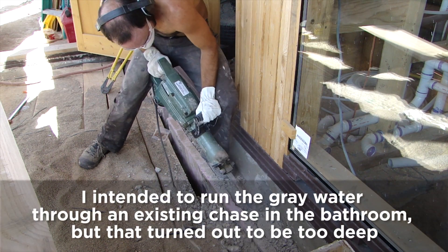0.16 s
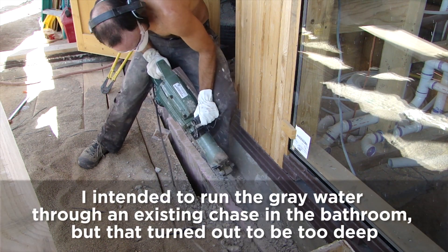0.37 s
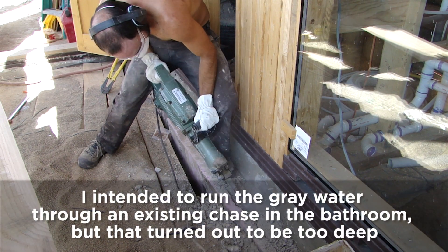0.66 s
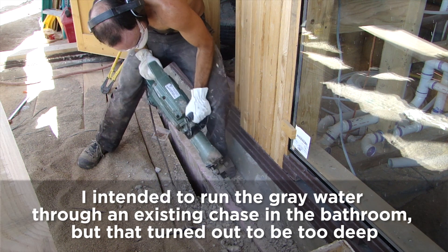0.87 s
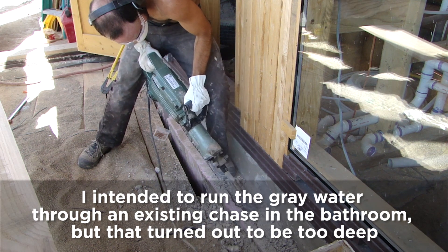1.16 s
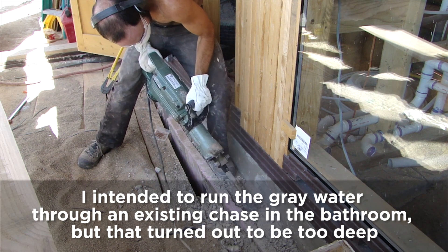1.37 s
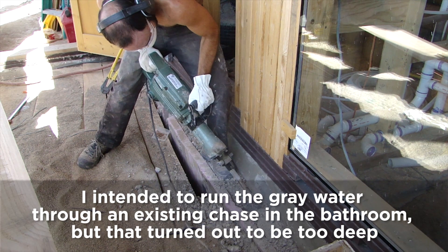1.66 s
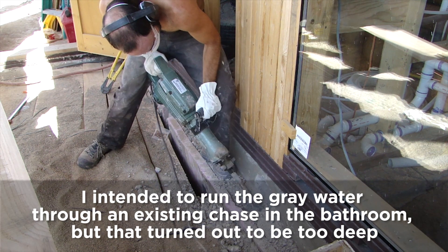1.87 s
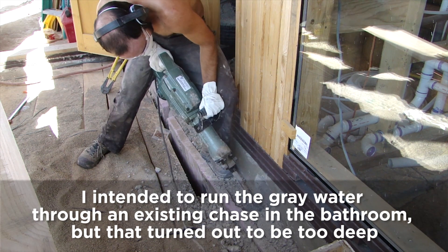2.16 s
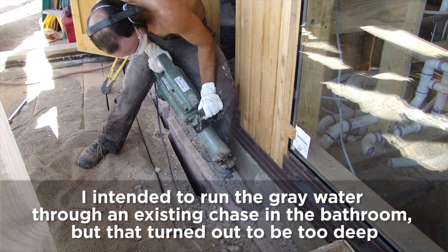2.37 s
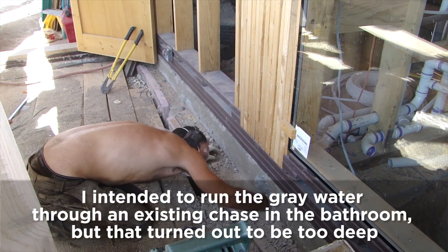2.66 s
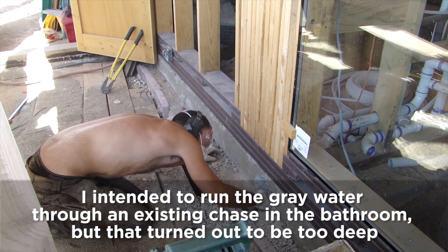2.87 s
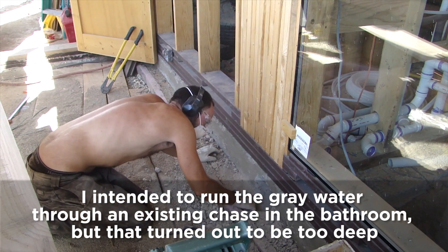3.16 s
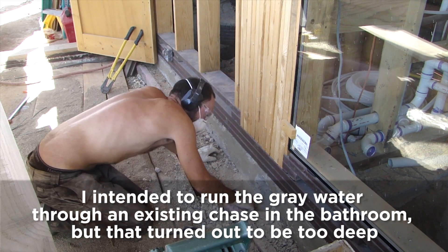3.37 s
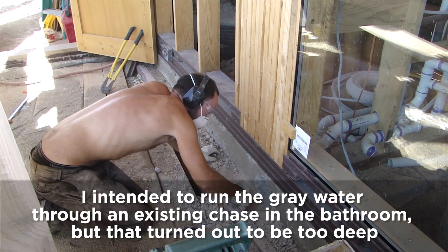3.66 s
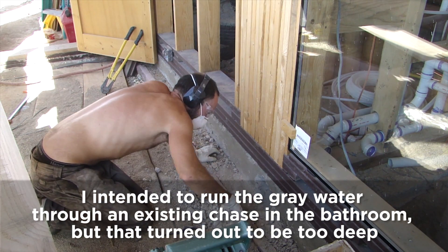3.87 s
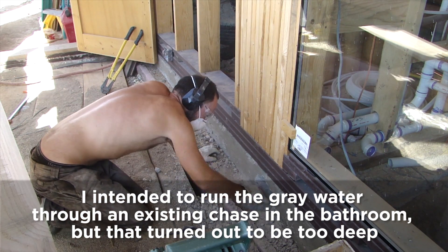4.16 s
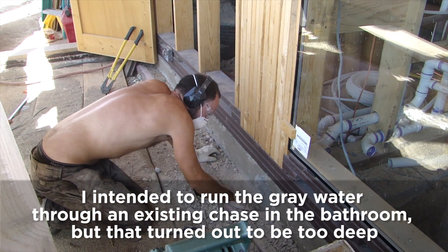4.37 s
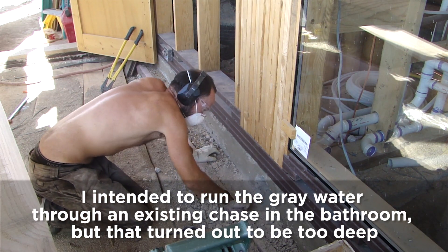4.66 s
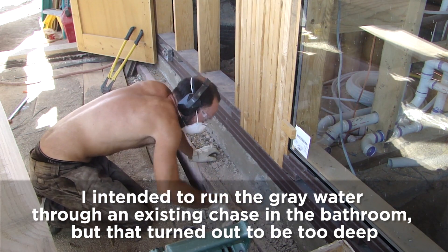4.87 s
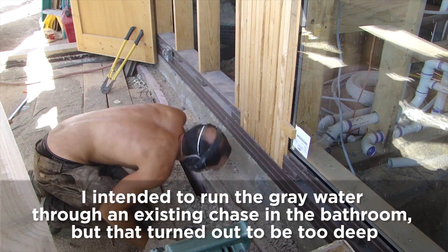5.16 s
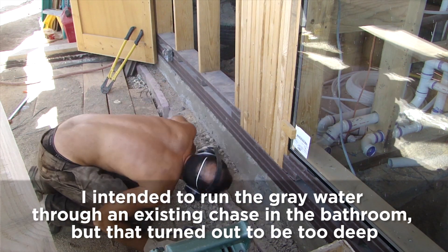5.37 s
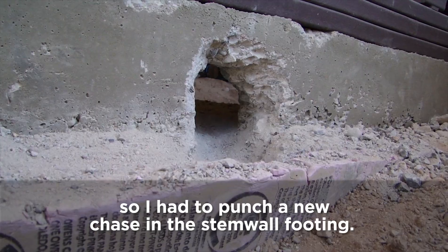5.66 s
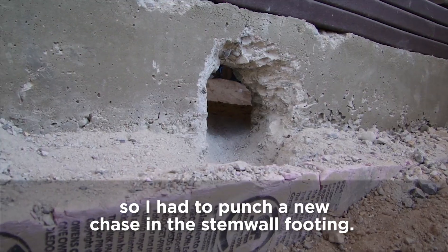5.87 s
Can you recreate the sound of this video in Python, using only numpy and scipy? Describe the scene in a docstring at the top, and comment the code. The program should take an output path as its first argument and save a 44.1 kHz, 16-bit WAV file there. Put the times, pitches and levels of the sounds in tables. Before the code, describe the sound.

From 0 to 0.85 s an electric demolition hammer chisels concrete very loudly: dry cracks at around 24 a second, each restarting a bright, uneven steel ring with hissing grit, over rasping gears and rattling housing. The blows stop and the motor sags, quietest near 0.95 s, then its gritty whirr climbs again to about 1.5 s. A hard clack and thud hit at 1.76 s; smaller jolts near 1.95 s lead into a strained, rattling run with a thin screech until 2.73 s. There everything cuts dead. Much quieter, rubble is dragged over boards in short gritty scrapes, with stony clacks and clinks, strongest around 3.6 and 4.5 s. After 4.8 s only sparse soft knocks and a faint rub remain, with a dull thump near 5.7 s and faint steady outdoor air. Short timber-room echo, small bass-light microphone.

```python
"""Demolition hammer, then rubble cleared by hand

In a timber-framed room an electric demolition hammer chisels a concrete footing: each blow cracks
and restarts a set of dying sines, the ring of the steel. The tool runs on with rasping gears (coloured
grains) and kicks, until a hard cut at 2.73 s goes straight to the rubble: grains and noise bursts make
broken concrete dragged across the floor by hand, with knocks and clinks. Faint outdoor air lies behind."""
import sys
import numpy as np
from scipy import signal
from scipy.fft import rfft, irfft, next_fast_len
from scipy.io import wavfile

SR = 44100
rng = np.random.default_rng(int(sys.argv[2]) if len(sys.argv) > 2 else 0)


def wav_out(sig):
    """Save sig, one row per channel (or a flat mono array), as 16-bit PCM at SR to the path in sys.argv[1]."""
    wavfile.write(sys.argv[1], SR, np.round(np.clip(np.atleast_2d(sig).T, -1, 1) * 32767).astype(np.int16))


N = 265036  # samples, about 6 s

# Resonances of housing and gear case: (frequency [Hz], width [Hz], lift [dB])
HOUSING = [(392, 21, 0.5), (553, 28, 6.5), (796, 37, 2.5), (1153, 35, 1.5), (1287, 31, 4.5),
           (1554, 24, 9.5), (1894, 33, -2), (1937, 70, 4.5), (2210, 82, 2), (2330, 30, 1.5), (2690, 64, 3),
           (2960, 120, -0.5), (3040, 54, 3), (3196, 90, 5), (4220, 92, 9.5), (4410, 32, 8.5),
           (7547, 200, -2), (9300, 780, 5.5)]
# Hollow resonances of the floor boards: (frequency [Hz], width [Hz], lift [dB])
BOARDS = [(342, 19, -0.5), (523, 28, 4.5), (678, 18, 6), (858, 46, 5), (1120, 40, 6.5), (1270, 35, 4.5),
          (1400, 30, 1.5), (1554, 50, 3.5), (1840, 120, 2.5), (2810, 74, 6), (3080, 50, 3),
          (3560, 75, -0.5), (3450, 80, 0.5), (3900, 79, 5)]
# Ring of the loose pieces: (frequency [Hz], width [Hz], lift [dB])
STONES = [(1180, 61, 3), (1430, 200, 1), (2710, 93, 0), (3430, 100, 2)]
# Low spectrum of tool and floor shaking: (frequency [Hz], relative level [dB])
RUMBLE = [(25, -38), (70, -34), (140, -13.5), (210, -3), (310, -2.5), (520, 1.5), (1100, 6), (2000, -0.5),
          (4000, -35), (13000, -60)]
# Spectrum of the tip cracking concrete: (frequency [Hz], relative level [dB])
CRACK = [(30, -41.5), (150, -42), (500, -16.5), (1200, 2.5), (3300, 8), (6000, 3), (8000, -7.5),
         (12000, -10.5), (13500, -31)]
# Spectrum of stone grinding on stone: (frequency [Hz], relative level [dB])
GRIND = [(100, -60), (600, -1), (1100, -0.5), (1500, 2.5), (2300, -0.5), (3300, -2), (4500, -7),
         (7000, -17), (13000, -46)]


def chisel():
    """Each blow cracks the concrete, chokes the old ring of the steel and starts a new one, duller or brighter."""
    # Piston blows: (time [s], crack [dB], ring [dB], pitch where the steel rings most [Hz])
    blows = [(0.085, -2, -20.5, 8540), (0.144, -2, -36.5, 5930), (0.1943, -2, -23, 8020),
             (0.2442, -3.5, -20.5, 8500), (0.2908, -5, -24, 6200), (0.3344, -5.5, -31, 4000),
             (.3718, -1.5, -18, 4000), (.4129, -12.5, -18, 6200), (0.4564, -6, -19.5, 6210),
             (0.5017, -6.5, -25.5, 5600), (0.5388, -5, -21, 5020), (0.5805, -9.5, -25, 6500),
             (0.6185, -3, -30.5, 7500), (0.6594, -6.5, -26.5, 4000), (0.7026, -6.5, -26, 6200),
             (0.744, -10, -28.5, 7540), (.7843, -8.5, -19.5, 4000), (0.831, -8, -28, 7900),
             (.881, -35, -42, 6500)]
    # Free ring of the steel: (frequency [Hz], level [dB], decay by 60 dB [s])
    steel_modes = [(3920, 2, .2), (5012, -3, .3), (6118, 0, .35), (6223, -5, .25), (7483, -3.5, .4),
                   (8036, -12, .25), (8753, -4, .28), (8850, -8, .15), (10928, -13, .45), (11520, -9, .22)]
    # Grit sprayed from the tip: (frequency [Hz], relative level [dB])
    spray_spectrum = [(500, -39), (3000, -9.5), (6000, -0.5), (9000, 3.5), (10500, -1), (11600, 7),
                      (12300, -4.5), (13000, -24)]
    spray_db, spray_t60_s = -24, 0.23  # level relative to the crack
    falloff_db_per_octave, scatter_db = -15.5, 2.5

    times, crack_db, ring_db, centre_hz = np.transpose(blows)
    t = np.arange(N) / SR
    last = np.maximum(np.searchsorted(times, t) - 1, 0)  # index of the latest blow
    age = np.maximum(t - times[last], 0)
    spray_envelope = dying(times, crack_db + spray_db, spray_t60_s)
    spray = spray_envelope * colour(grains(per_s=3900, spread_db=2.0), spray_spectrum)
    out = burst(times, crack_db, 0.012, CRACK) + spray
    for hz, level_db, t60 in steel_modes:
        octaves_off = np.abs(np.log2(hz / centre_hz))
        strength_db = ring_db + level_db + falloff_db_per_octave * octaves_off
        strength_db = strength_db + rng.normal(0, scatter_db, len(times))
        # the tip seats differently every time
        pitch = hz * (1 + 0.0021 * rng.standard_normal(len(times)))
        ring = np.sin(2 * np.pi * pitch[last] * age)
        out = out + from_db(strength_db[last] - 60 * age / t60) * ring
    return out


def motor():
    """Gear teeth and loose parts clatter in the droning housing; load adds rattle, screech and floor rumble."""
    # How hard the motor drives the gears: (time [s], level [dB])
    effort_curve = [(0, -17), (.07, -17.5), (.11, -24), (.3, -22), (.65, -20.5), (.75, -28), (.87, -30.5),
                    (.95, -34), (1.2, -26.5), (1.46, -21), (1.75, -21), (1.83, -24.5), (1.95, -25),
                    (1.99, -17), (2.24, -17.5), (2.35, -20.5), (2.6, -22.5), (2.72, -23)]
    # Leaning on the tool: (start [s], end [s], rattle [dB], screech [dB], floor rumble [dB])
    loads = np.array([(0, 0.871, -25, -45.5, -29.5), (1.965, 2.733, -27, -29, -38.5)])
    # The housing groans as the mechanism takes hold: (time [s], level [dB])
    groans = np.array([(.04, -33), (1.72, -32), (2.02, -27.5)])
    # Spectra of gears, loose parts, screech and drone: (frequency [Hz], relative level [dB])
    rasp_spectrum = [(200, -43.5), (330, -28.5), (440, -13), (700, -11.5), (1050, -8.5), (1300, -5.5),
                     (2000, -1.5), (3100, 2), (4300, -2.5), (5400, -6.5), (7000, -15), (10000, -23),
                     (14000, -58.5)]
    rattle_spectrum = [(2000, -24), (4000, 11.5), (6000, 9), (7500, 2), (9700, 2), (11800, -2.5),
                       (12600, -16.5), (13200, -38)]
    screech_spectrum = [(500, -52.5), (3500, -7), (4500, -5), (5400, 3), (5900, -11.5), (7000, -22),
                        (13000, -53.5)]
    drone_spectrum = [(200, -45), (340, -21), (410, -2), (560, 1.5), (680, -3), (1000, -20), (4000, -61.5)]
    # what follows the effort even without load, relative to it
    free_rattle_db, free_screech_db, free_rumble_db, free_drone_db = -18.5, -28.5, -24.5, -13
    drone_follows = 1.48  # the drone grows faster than the rasp: dB per dB
    attack_s, sag_db_per_s, release_db_per_s = 0.035, -7, -170
    groan_width_s = 0.032  # from the peak to 1/e

    t = np.arange(N) / SR
    times, effort_db = np.transpose(effort_curve)
    effort = from_db(np.interp(t, times, effort_db))
    leaning = [push(start, end, attack_s, sag_db_per_s, release_db_per_s) for start, end in loads[:, :2]]
    load_levels_db = [(free_rattle_db, free_screech_db, free_rumble_db), *loads[:, 2:]]
    rattle_gain, screech_gain, rumble_gain = together([effort] + leaning, load_levels_db)
    swells = [np.exp(-((t - s) / groan_width_s) ** 2) for s in groans[:, 0]]
    drone_gain = together([effort ** drone_follows] + swells, [free_drone_db, *groans[:, 1]])

    shake = rms_one(from_db(1.74 * drift(330)))  # the striker tumbles unevenly in its tube
    rasp = from_db(-1.0) * effort * colour(grains(per_s=12000, spread_db=2.5), rasp_spectrum, HOUSING)
    rattle = rattle_gain * colour(grains(per_s=6000, spread_db=4.5), rattle_spectrum)
    screech = screech_gain * colour(rng.standard_normal(N), screech_spectrum)
    rumble = rumble_gain * colour(rng.standard_normal(N), RUMBLE, HOUSING)
    drone = drone_gain * colour(rng.standard_normal(N), drone_spectrum, HOUSING)
    return shake * (rasp + rattle + screech) + rumble + drone


def kicks():
    """A hard clack and a thud as the tip bites, then the housing and floor shudder."""
    # The housing jolts as the chisel slips: (time [s], clack [dB], bite of the tip [dB], thud [dB])
    jolts = [(1.7637, -5, -25, -23), (1.935, -21, -24, -48), (1.968, -19, -6.5, -45)]
    # Spectrum of a jolt: (frequency [Hz], relative level [dB])
    jolt_spectrum = [(30, -44), (200, -44), (550, 4.5), (1000, -8), (2500, 5), (4200, -4), (7000, -17),
                     (9000, -7), (12000, -28), (13000, -47)]
    # Resonances of the casing: (frequency [Hz], width [Hz], lift [dB])
    casing = [(1320, 200, 10), (2420, 240, 6.3), (4250, 300, 6), (8860, 750, 7.5)]
    shudder_db, shudder_t60_s = -3.5, 1  # level relative to the thud

    times, clack_db, bite_db, thud_db = np.transpose(jolts)
    clack = burst(times, clack_db, 0.026, jolt_spectrum, casing)
    bite = burst(times, bite_db, 0.0084, CRACK)
    thud = burst(times, thud_db, 0.092, RUMBLE, HOUSING)
    shudder = burst(times, thud_db + shudder_db, shudder_t60_s, RUMBLE, HOUSING)
    return clack + bite + thud + shudder


def rubble():
    """Coarse pieces rub the boards and grind on each other in fits and starts while sand hisses between them."""
    # Strokes of the hand: (start [s], length [s], stones grinding [dB], boards rubbed [dB],
    # sandy hiss [dB], swell [dB/s])
    strokes = np.array([(2.687, 0.099, -35.5, -37.5, -51, -44), (2.806, 0.2, -45, -45, -57, 15),
                        (2.989, 0.28, -43.5, -44.5, -54, 17), (3.275, .05, -43.5, -57, -49, 0),
                        (3.368, 0.12, -44, -50, -56, 116), (3.491, 0.11, -35, -39, -44, 18),
                        (3.595, 0.028, -25.5, -47, -33.5, -3), (3.959, 0.089, -56.5, -71, -48.5, 15),
                        (4.069, 0.097, -42.5, -52.5, -51, 35), (4.284, .10, -51.5, -57.5, -56, 175),
                        (4.362, 0.079, -38, -42, -37, 0), (4.446, 0.14, -28, -38, -40, -26),
                        (4.596, 0.045, -38, -50, -45.5, 2), (4.669, 0.065, -39, -49, -43, 95),
                        (4.89, .08, -66, -56, -51, 0), (5.16, 0.41, -58.5, -57, -73, 2)])
    # Spectra of rubbed boards and hissing sand: (frequency [Hz], relative level [dB])
    rub_spectrum = [(40, -38), (130, -25.5), (195, -11.5), (280, -12), (350, -4), (520, -4.5), (830, -5),
                    (1100, -9.5), (2000, -15), (8000, -53)]
    sand_spectrum = [(150, -50), (1500, -18), (3500, 0), (6000, 1), (8000, -3.5), (11500, -1.5),
                     (12500, -13), (13200, -34)]

    envelopes = [stroke(start, length, swell) for start, length, *_, swell in strokes]
    grind_gain, rub_gain, sand_gain = together(envelopes, strokes[:, 2:-1])
    catching = rms_one(from_db(0.63 * drift(110)))
    rub = rub_gain * colour(grains(per_s=4000, spread_db=1.7), rub_spectrum, BOARDS)
    grind = grind_gain * colour(grains(per_s=5000, spread_db=2.5), GRIND, BOARDS + STONES)
    sand = sand_gain * colour(grains(per_s=4000, spread_db=2.5), sand_spectrum)
    return catching * (rub + grind + sand)


def stroke(start, length, swell_db_per_s):
    """The hand pushes and lets go; loose pieces go on sliding and settle more slowly."""
    attack_s, release_db_per_s = 0.045, -230
    settle_db, settle_db_per_s = -12, -68
    pushed = push(start, start + length, attack_s, swell_db_per_s, release_db_per_s)
    settling = push(start, start + length, attack_s, swell_db_per_s, settle_db_per_s)
    return np.maximum(pushed, from_db(settle_db) * settling)


def lumps():
    """A lump lands with a tick, a clack on its neighbours and a trickle of grit; the boards thump under it."""
    # Lumps knocking: (time [s], clink [dB], stony clack [dB], board thump [dB])
    landings = [(3.010, -35, -42, -53), (3.408, -41, -42, -48), (3.642, -25, -20, -51),
                (3.856, -41.5, -40.5, -46), (4.079, -56, -38.5, -67), (4.269, -46, -39.5, -44),
                (4.500, -34, -26, -47), (4.714, -30, -31.5, -55), (4.827, -61, -48, -60),
                (4.877, -43, -63, -70), (4.948, -60.5, -40, -51.5), (5.060, -59, -72, -65),
                (5.100, -55, -49, -63), (5.206, -56, -41, -47), (5.682, -68, -49.5, -56),
                (5.727, -68, -58, -56), (5.833, -69, -60, -59)]
    # Spectra of clink and thump: (frequency [Hz], relative level [dB])
    clink_spectrum = [(100, -55), (800, -37), (2500, 2), (4500, 5.5), (7000, -0.5), (12000, -1.5),
                      (13200, -32)]
    thump_spectrum = [(30, -24), (90, -20), (140, 3), (330, 5.5), (700, 3), (1200, -24), (2500, -40),
                      (10000, -70)]
    clack_rise_s = 0.005  # the neighbours are jostled one after another

    times, clink_db, clack_db, thump_db = np.transpose(landings)
    tick = burst(times, clink_db, 0.012, clink_spectrum)
    grit = colour(grains(per_s=3500, spread_db=2.5), clink_spectrum)
    trickle = from_db(-2) * dying(times, clink_db, 0.25) * grit
    lag = np.exp(-1 / (clack_rise_s * SR))
    jostled = signal.lfilter([1 - lag], [1, -lag], dying(times, clack_db, 0.16))
    clack = jostled * colour(grains(per_s=6000, spread_db=2.5), GRIND, BOARDS + STONES)
    thump = burst(times, thump_db, 0.15, thump_spectrum, BOARDS)
    return tick + trickle + clack + thump


def thuds():
    """The floor gives a low, short boom under a weight."""
    # Dull thuds of weight on the floor: (time [s], level [dB])
    weights = [(4.517, -53), (5.681, -54)]
    # Spectrum of the boom: (frequency [Hz], relative level [dB])
    thud_spectrum = [(30, -14), (130, -5), (200, 2), (400, -25), (2000, -63)]
    times, level_db = np.transpose(weights)
    return burst(times, level_db, 0.089, thud_spectrum)


def outdoor_air():
    """Steady noise of distant outdoor air through the open walls."""
    # Spectrum of the air: (frequency [Hz], relative level [dB])
    air_spectrum = [(25, -17), (60, -8.5), (150, 1.5), (300, 7.5), (600, 2.5), (1200, -1.5), (2200, -2),
                    (5000, -11), (11000, -13.5), (12500, -24.5), (13200, -42)]
    return from_db(-59) * colour(rng.standard_normal(N), air_spectrum)


def room(x, wet_db, wall_hz):
    """Direct sound plus dense, dulled reflections from the timber walls."""
    t60_s = 0.34
    t = np.arange(SR // 2) / SR
    tail = rng.standard_normal(len(t)) * from_db(-60 * t / t60_s)
    tail = tail * (t > .004)  # the first reflection takes 4 ms
    dulling = signal.butter(1, wall_hz, fs=SR, output="sos")
    tail = signal.sosfilt(dulling, tail / np.linalg.norm(tail))
    return x + from_db(wet_db) * signal.fftconvolve(x, tail)[:N]


def burst(times, levels_db, t60, spectrum, resonances=()):
    """Impacts on a body whose dense modes die together."""
    return dying(times, levels_db, t60) * colour(rng.standard_normal(N), spectrum, resonances)


def dying(times, levels_db, t60):
    """An envelope that jumps at each time and falls 60 dB in t60 seconds."""
    jumps = np.zeros(N)
    jumps[np.round(np.asarray(times) * SR).astype(int)] = from_db(levels_db)
    return signal.lfilter([1], [1, -from_db(-60 / (t60 * SR))], jumps + 1e-18)


def push(start, end, attack_s, slope_db_per_s, release_db_per_s):
    """An envelope that rises, holds with a slope and dies away."""
    t = np.arange(N) / SR
    held = np.clip(t, start, end) - start
    after = np.maximum(t - end, 0)
    rise = np.clip((t - start) / attack_s, 0, 1)
    return rise * from_db(slope_db_per_s * held + release_db_per_s * after)


def together(envelopes, levels_db):
    """Envelopes added in power: one gain curve for each column of levels."""
    return np.sqrt(from_db(levels_db).T ** 2 @ np.array(envelopes) ** 2)


def grains(per_s, spread_db):
    """Random tiny contacts: many weak ones, a few strong; rms 1."""
    born = rng.random(N) < per_s / SR
    sizes = from_db(spread_db * np.minimum(rng.exponential(1, N), 4))
    return rms_one(born * sizes * rng.choice([-1, 1], N))


def drift(rate):
    """Smooth chance with rms 1, heading for a new value so many times a second."""
    knots = rng.standard_normal(N // 16)
    return rms_one(np.interp(np.arange(N) * rate / SR, np.arange(len(knots)), knots))


def colour(x, spectrum, resonances=()):
    """Give a signal a broad spectrum with resonant humps on it; rms 1."""
    size = next_fast_len(N + 4096)
    hz = np.maximum(np.arange(size // 2 + 1) * SR / size, 1)
    points = np.array(spectrum, float)
    db = np.interp(np.log(hz), np.log(points[:, 0]), points[:, 1])
    for centre, width, lift in resonances:
        db = db + lift / (1 + (2 * (hz - centre) / width) ** 2)
    return rms_one(irfft(rfft(x, size) * from_db(db), size)[:N])


def rms_one(x):
    """Scale to unit power."""
    return x / np.sqrt(np.mean(x ** 2) + 1e-20)


def from_db(db):
    """Decibels to gain."""
    return 10 ** (np.asarray(db) / 20)


def scene():
    """Hammering up to a hard cut that takes its echoes too, then clearing up; faint outdoor air throughout."""
    cut_s, fade_s = 2.731, 0.00078
    before_cut = np.clip((cut_s - np.arange(N) / SR) / fade_s, 0, 1)
    hammer = room(chisel() + motor() + kicks(), wet_db=-7.5, wall_hz=7070)
    clearing = room((1 - before_cut) * rubble() + lumps() + thuds(), wet_db=-7, wall_hz=4970)
    return (before_cut * hammer + clearing + outdoor_air())[None]


def record(dry):
    """The loudest peaks are rounded off, the small microphone thins the bass, the top is cut."""
    full_scale, low_cut_hz, top_hz = .7, 308, 14300
    rounded = dry / (1 + (dry / full_scale) ** 4) ** (1 / 4)
    thin = signal.sosfilt(signal.butter(1, low_cut_hz, "high", fs=SR, output="sos"), rounded)
    return signal.sosfiltfilt(signal.cheby2(12, 40, top_hz, fs=SR, output="sos"), thin)


dry = scene()
out = record(dry)
wav_out(out)
```